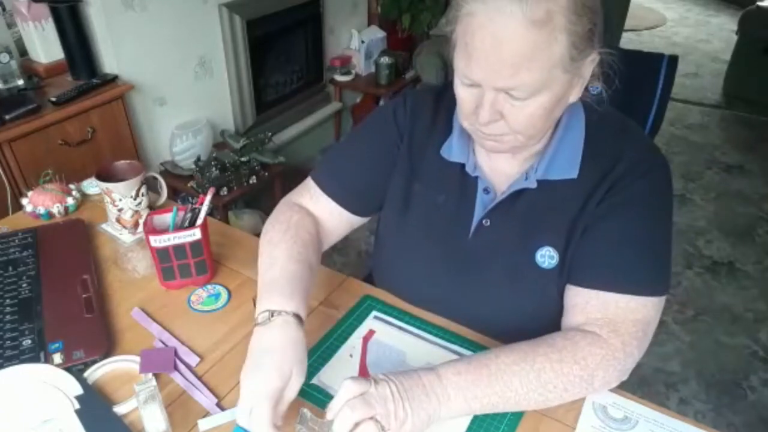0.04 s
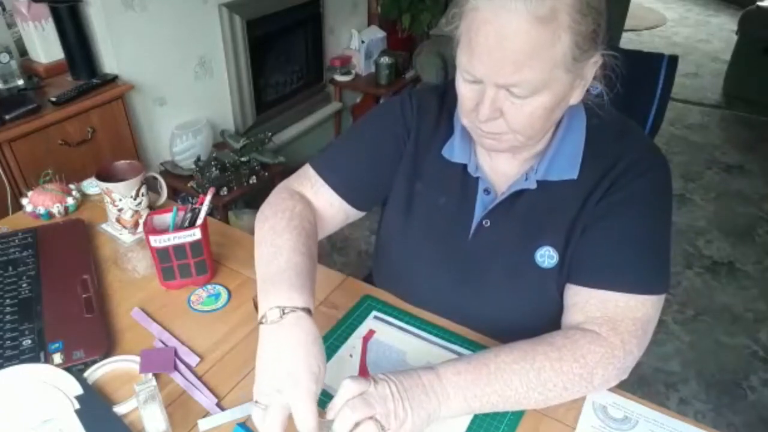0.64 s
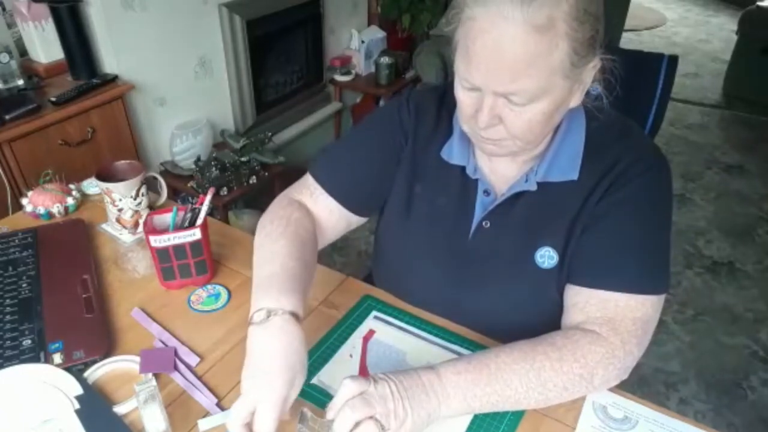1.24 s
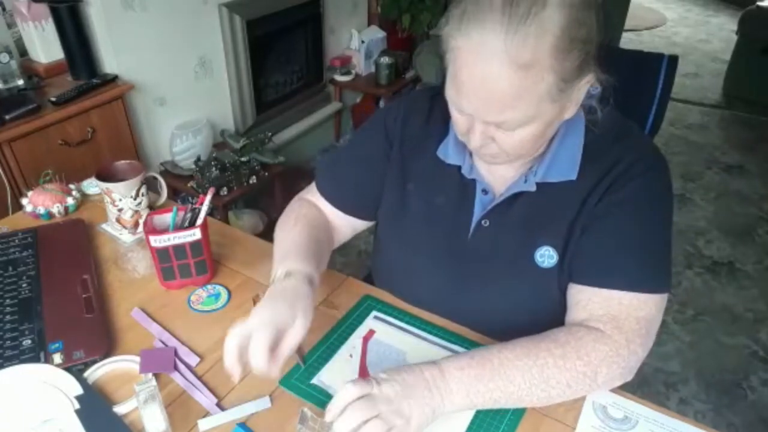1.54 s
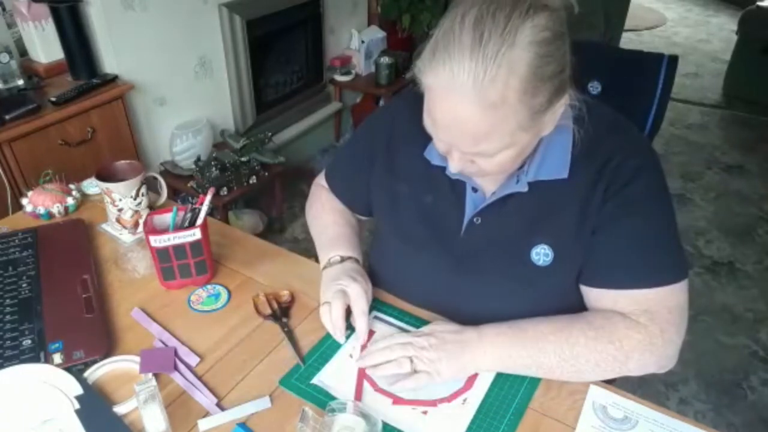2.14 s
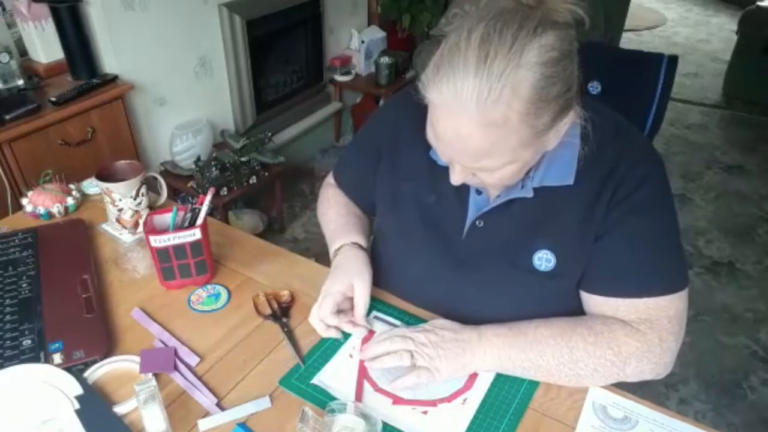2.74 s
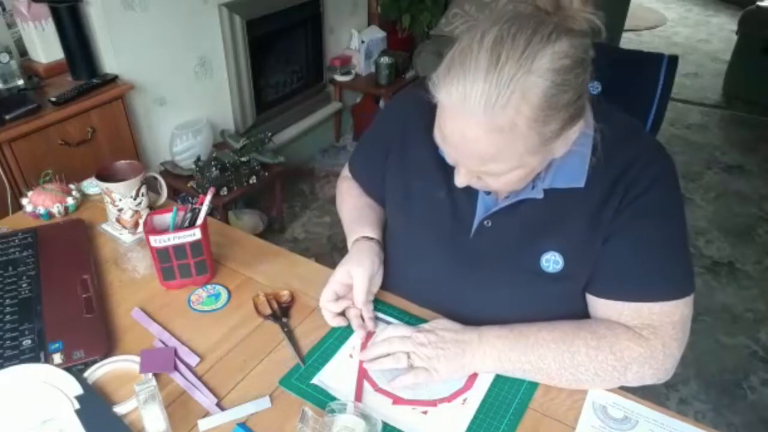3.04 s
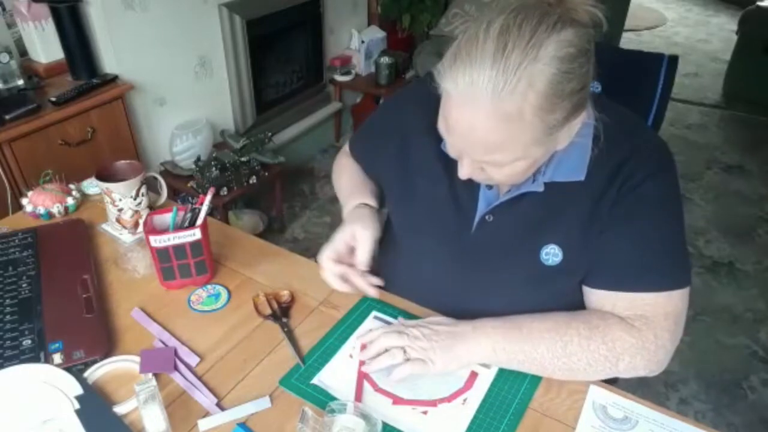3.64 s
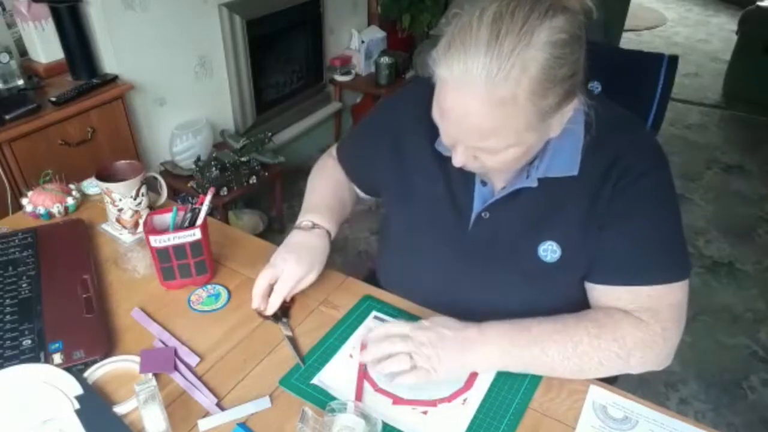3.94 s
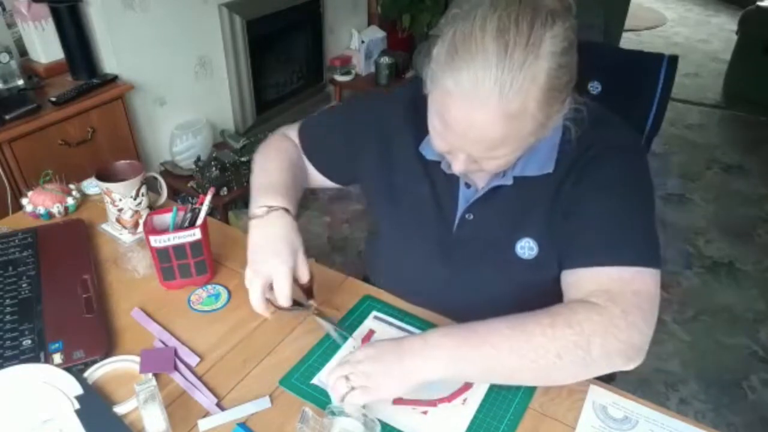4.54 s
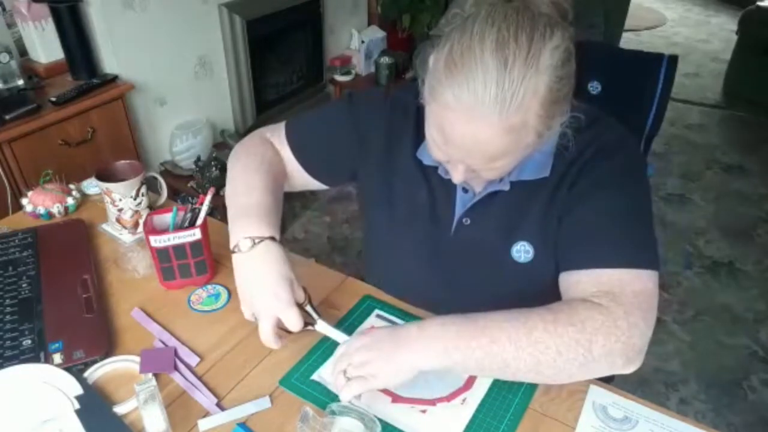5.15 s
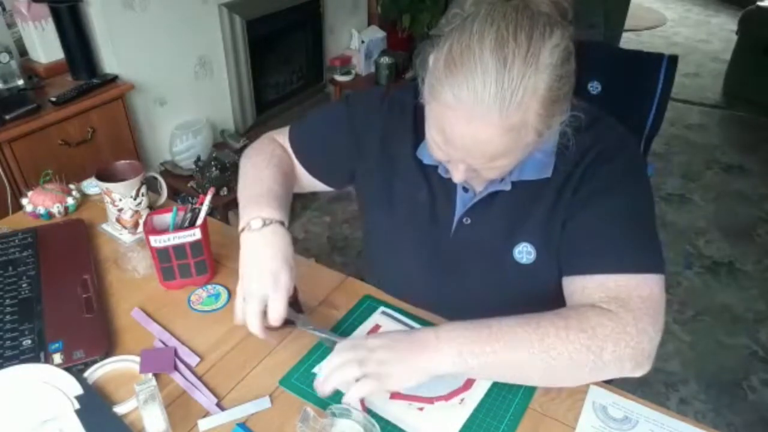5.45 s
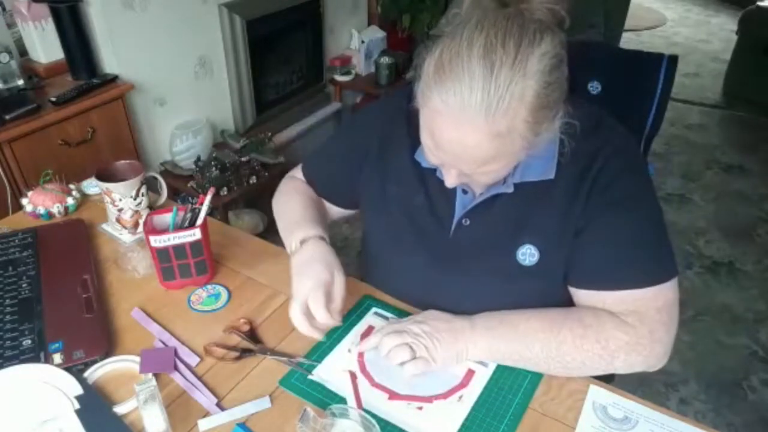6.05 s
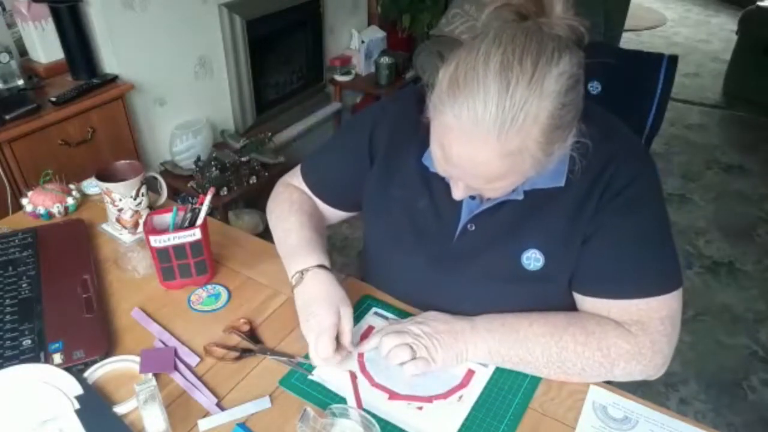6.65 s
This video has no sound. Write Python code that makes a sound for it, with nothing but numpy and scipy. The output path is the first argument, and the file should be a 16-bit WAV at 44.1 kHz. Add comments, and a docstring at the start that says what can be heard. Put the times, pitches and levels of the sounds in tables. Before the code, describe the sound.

Close by at a wooden table in a small, quiet room, someone tugs sticky tape from a roll and tears it off. Soft paper swishes follow, then a few ticks and a dry, bright snap. Scissors knock lightly as they are lifted, cut through paper with a single sharp snip, and are put down with a brief rattle. A faint hiss and low drone lie underneath.

```python
"""Scissors snip once and clatter onto a wooden table, after tape is pulled off its roll in jerks and torn
and a paper strip is pressed onto a cutting mat. Each contact is a noise crack plus damped modes of the
object and the table. The tape sticks and slips; rubbing and shearing are grainy filtered noise.
A small, quiet room adds short reverberation, hiss and a low drone."""
import sys
import numpy as np
from scipy import signal
from scipy.fft import rfft, irfft, next_fast_len
from scipy.io import wavfile
from scipy.ndimage import map_coordinates

SR = 44100
rng = np.random.default_rng(int(sys.argv[2]) if len(sys.argv) > 2 else 0)


def generate_wav(signal):
    """Clip the signal to [-1, 1] and save it as 16-bit WAV at the path in sys.argv[1]."""
    frames = np.transpose(np.atleast_2d(signal))
    scaled = np.clip(frames, -1, 1) * 32767
    pcm = np.round(scaled).astype(np.int16)
    wavfile.write(sys.argv[1], SR, pcm)


N = 299880
T = np.arange(SR // 2) / SR  # time axis of one contact, s

# scissor handles and steel blades: f/Hz, level/dB, t60/s
SCISSOR_MODES = [(870, -8, .06), (925, -6, .08), (1088, -3, .14), (1140, -1, .18), (1260, -3, .08),
                 (1385, 0, .1), (1477, -4, .08), (2190, -5, .12), (2331, -5, .12), (2503, -5, .12),
                 (2810, -4, .11), (3946, -3, .1), (4721, -4, .1), (5030, -4, .08), (7321, -5, .09),
                 (7887, -2, .08), (8533, -4, .12), (9292, -6, .08), (11170, -2, .08), (11750, -4, .08),
                 (14500, -8, .06)]


def amp(db):
    """Decibels to gain."""
    return 10 ** (np.asarray(db) / 20)


def unit(x):
    """Scale to rms 1."""
    return x / np.sqrt(np.mean(x ** 2) + 1e-20)


def one_blow(x):
    """Scale each channel to the energy of 1 ms at rms 1."""
    return x * np.sqrt(SR / 1000 / np.sum(x ** 2, axis=-1, keepdims=True))


def along(points, hz):
    """Interpolate (f/Hz, value) points on a log axis."""
    knots_hz, values = np.transpose(points)
    return np.interp(np.log(hz + 1), np.log(knots_hz + 1), values)


def wobble(rate_hz, size):
    """Smooth random curve."""
    knots = rng.standard_normal(int(size * rate_hz / SR) + 4)
    return map_coordinates(knots, [np.arange(size) * rate_hz / SR])


def filtered(x, response):
    """Apply the frequency response response(hz)."""
    size = x.shape[-1]
    padded = next_fast_len(size + 4096, True)
    return irfft(rfft(x, padded) * response(np.fft.rfftfreq(padded, 1 / SR)), padded)[..., :size]


def causal(spectrum):
    """Minimum-phase response: nothing sounds before the blow."""
    cepstrum = irfft(np.log(amp(along(spectrum, np.fft.rfftfreq(len(T), 1 / SR)))))
    cepstrum[1:len(T) // 2] *= 2
    cepstrum[len(T) // 2 + 1:] = 0
    return np.exp(rfft(cepstrum))


def split(x, edge_hz):
    """Low and high band, each at the energy of one blow."""
    return [one_blow(signal.sosfilt(signal.butter(4, edge_hz, side, fs=SR, output="sos"), x))
            for side in ("low", "high")]


def noise_pair(corr, size):
    """Stereo white noise with left-right correlation corr."""
    common = np.sqrt(corr) * rng.standard_normal(size)
    return common + np.sqrt(1 - corr) * rng.standard_normal((2, size))


def add(track, start_s, sound):
    """Mix a sound into the track."""
    start = round(start_s * SR)
    part = sound[:, max(-start, 0):N - start]
    track[:, max(start, 0):][:, :part.shape[1]] += part


def fade(t60_s):
    """Exponential decay."""
    return np.exp(-np.log(1000) * T / t60_s)


def burst(colour, envelope, corr):
    """Short coloured puff of noise."""
    return one_blow(irfft(rfft(noise_pair(corr, len(T)) * envelope) * colour))


def ring(modes, spread_rad):
    """Damped modes, with random strengths per blow and phases per channel."""
    sound = 0
    for hz, db, t60_s in modes:
        level, phase, apart = rng.standard_normal(3)
        phase_rad = np.pi * phase + spread_rad * apart * np.array([[1], [-1]])
        sound += amp(db + 2 * level) * fade(t60_s) * np.sin(2 * np.pi * hz * T + phase_rad)
    attack = 1 - fade(6 / modes[0][0])  # six periods of the first mode
    return one_blow(sound * attack)


def room_tone(hiss_db=-65, drone_db=-66, drone_hz=97, half_width_hz=12, waver_db=2):
    """Faint even hiss over a low, unsteady drone."""
    # hiss spectrum: f/Hz, density/dB
    hiss_spectrum = [(12, -53), (20, -20.5), (58, -12.5), (96, -7.5), (210, -20.5), (277, -18),
                     (319, -20.5), (357, -19), (527, -25), (802, -23), (2080, -28), (2320, -27.5),
                     (2600, -30), (14300, -34), (16000, -40.5)]
    # hiss stereo image: f/Hz, left-right correlation
    hiss_corr = [(60, 0.92), (180, 0.93), (550, -0.13), (1650, -0.18), (4970, -0.16), (15000, -0.2)]

    def mid_side(hz):
        angle = np.arccos(along(hiss_corr, hz)) / 2
        return amp(along(hiss_spectrum, hz)) * [np.cos(angle), np.sin(angle)]

    mid, side = filtered(rng.standard_normal((2, N)), mid_side)
    hiss = amp(hiss_db) * unit(np.array([mid + side, mid - side]))
    band = filtered(rng.standard_normal(N), lambda hz: 1 / (1 + ((hz - drone_hz) / half_width_hz) ** 2))
    drone = amp(drone_db + waver_db * wobble(2.8, N)) * unit(band)
    return hiss + drone * amp([[1], [-1]])


def in_room(sound, wet_db):
    """Direct sound plus wall reflections, a new noise tail per event."""
    # reverberation time: f/Hz, t60/s
    decay = [(200, .3), (700, .28), (2000, .26), (5000, .22), (13000, .185)]
    # reverberation colour: f/Hz, level/dB
    colour = [(100, -9.5), (400, -3.5), (1000, -1.5), (4000, 2), (9000, -2.5), (15000, -3.5)]
    hz, t, bins = signal.stft(noise_pair(0.26, len(T)), SR, nperseg=256)
    bins *= amp(along(colour, hz)[:, None] - 60 * t / along(decay, hz)[:, None])
    tail = signal.istft(bins, SR, nperseg=256)[1][:, :len(T)] * (1 - fade(0.0062))
    heard = signal.fftconvolve(sound, amp(wet_db) * tail / np.linalg.norm(tail[0]), axes=1)
    heard[:, :sound.shape[1]] += sound
    return heard


def friction(size, colour, corr, grain_db=4.5, grain_hz=300):
    """Sliding contact: a stream of fine catches, at rms 1."""
    return unit(filtered(noise_pair(corr, size) * amp(grain_db * wobble(grain_hz, size)), colour))


def strokes(rows, width_oct, peak_share, corr, centre_hz=None):
    """Band-limited friction swells and eases with the pressure; a row may set its own centre."""
    track = np.zeros((2, N))
    for start_s, length_s, db, *own_hz in rows:
        size = int(max(length_s, .01) * SR)
        band_hz = own_hz[0] if own_hz else centre_hz
        rub = friction(size, lambda hz: np.exp(-.5 * (np.log2((hz + 1) / band_hz) / width_oct) ** 2), corr)
        pressure = np.interp(np.linspace(0, 1, size), [0, peak_share, 1], [0, 1, 0])
        add(track, start_s, in_room(amp(db) * pressure * rub, wet_db=0))
    return track


def rubbing():
    """Sliding contacts: high for paper, blades and tape, lower for things on wood."""
    # paper swishes under the fingers and the closing blades: t/s, length/s, level/dB
    swishes = [(1.82, 0.44, -73.5), (2.253, 0.17, -63), (2.62, 0.57, -65.5), (3.437, 0.083, -36),
               (3.52, 0.44, -65.5), (4.322, 0.26, -58.5), (5.165, .035, -49), (5.46, 0.31, -48.5)]
    # hands and roll shift; the table booms and thuds under the rattling scissors:
    # t/s, length/s, level/dB, f/Hz
    rumbles = [(.275, 0.16, -56, 230), (.85, .1, -33.5, 340), (1.265, 0.065, -45.5, 350),
               (1.47, 0.11, -55, 300), (1.65, .7, -71, 330), (3.935, 0.058, -48, 282), (4.2, 0.13, -53, 98),
               (4.58, 0.81, -63.5, 95), (5.31, .08, -58.5, 500), (5.42, 0.27, -59.5, 450),
               (5.685, 0.082, -42, 300), (5.87, .11, -40, 330)]
    # things scuff on the wood, tape creeps, paper creases: t/s, length/s, level/dB, f/Hz
    scuffs = [(-.04, 0.12, -52, 1710), (.223, 0.011, -53, 3440), (.265, 0.09, -60, 4060),
              (.43, 0.071, -60.5, 1630), (.722, 0.059, -41.5, 2930), (1.424, 0.0089, -36.5, 2520),
              (1.441, 0.0096, -56.5, 2300), (3.358, 0.032, -56.5, 3850), (4.025, .06, -47, 790),
              (4.09, 0.11, -49.5, 1100), (5.49, 0.12, -61.5, 1494)]
    # a thin high ring as the tape tears: t/s, length/s, level/dB
    tear_ring = [(1.254, 0.012, -27.5)]
    return (strokes(swishes, width_oct=0.57, peak_share=0.18, corr=.15, centre_hz=9100)
            + strokes(rumbles, width_oct=0.56, peak_share=0.14, corr=.88)
            + strokes(scuffs, width_oct=1.0, peak_share=0.28, corr=.25)
            + strokes(tear_ring, width_oct=0.2, peak_share=0.32, corr=.15, centre_hz=6740))


def contacts(rows, crack_spectrum, modes, *, snap_t60_s, scatter_t60_s, scatter_db, sharp_db, zing_db,
             ring_db, body_db, body_t60_s, bite_db, bite_slope, bite_ring_slope=0,
             thud_db, thud_slope, wet_db):
    """Each contact cracks, rings the object and thuds into the table. Slopes in dB per dB of the row."""
    # wooden table: f/Hz, level/dB, t60/s
    table_modes = [(99, -3, 0.15), (171, -15.5, 0.24), (278.8, -0.5, 0.19), (320, -4.5, 0.18),
                   (364.4, -7.5, 0.22), (450, -6.5, 0.04), (538.8, 0, 0.085), (624, -7.5, 0.14),
                   (694, -13, 0.14)]
    # thud in the wood: f/Hz, density/dB
    thud_spectrum = [(30, -50.5), (60, -35.5), (100, -10), (140, -7), (280, -4), (450, -3.5), (700, -6.5),
                     (1200, -19), (3000, -59)]
    # midrange noise of a blow: f/Hz, density/dB
    body_spectrum = [(300, -28.5), (700, -13), (1150, -0.5), (1700, -12.5), (3000, -12.5), (6000, -33)]
    crack, body, thud = causal(crack_spectrum), causal(body_spectrum), causal(thud_spectrum)
    hard_hz = 2000  # modes above answer the hard edge of a blow, those below its push
    low_modes = [mode for mode in modes if mode[0] < hard_hz]
    high_modes = [mode for mode in modes if mode[0] >= hard_hz]
    # first snap, then scatter off the tabletop and the things on it
    snap = (fade(snap_t60_s) + amp(scatter_db) * fade(scatter_t60_s)) * (1 - fade(.001))
    track = np.zeros((2, N))
    for start_s, db, ring_rel_db in rows:
        edge = burst(crack, snap, corr=0.25) + amp(zing_db) * ring(high_modes, spread_rad=1.0)
        bite, sharp = split(edge, edge_hz=4940)
        hollow = amp(ring_db) * ring(low_modes, spread_rad=0.66)
        hollow += amp(body_db) * burst(body, fade(body_t60_s), corr=0.55)
        wood = ring(table_modes, spread_rad=0.098) + amp(-5) * burst(thud, fade(0.13), corr=0.92)
        blow = amp(db + sharp_db) * sharp + amp(db + ring_rel_db) * hollow
        blow += amp(bite_db + bite_slope * db + bite_ring_slope * ring_rel_db) * bite
        blow += amp(thud_db + thud_slope * db) * wood
        add(track, start_s, in_room(blow, wet_db))
    return track


def paper_snaps():
    """The strip ticks and snaps under the fingers, dry and bright."""
    # snaps: t/s, level/dB, relative ring/dB
    snaps = [(3.179, -39, -47), (3.3746, -42, -46), (3.4385, -35, -48), (3.4446, -24.5, -49),
             (3.4544, -28, -46), (3.477, -7.5, -28)]
    # paper crack: f/Hz, density/dB
    crack = [(1060, -19), (1800, -14), (2640, -9), (3350, -14.5), (4660, -14), (5490, -19), (11500, -5),
             (13600, -11), (16000, -18)]
    # paper on the cutting mat: f/Hz, level/dB, t60/s
    mat_modes = [(890, 26, 0.034), (1000, -9, .07), (1400, 2, .07), (1755, -15, .06), (2040, -9, .05),
                 (6180, -13, 0.026), (10720, -1, 0.036)]
    return contacts(snaps, crack, mat_modes, snap_t60_s=.004, scatter_t60_s=.02, scatter_db=-12,
                    sharp_db=-2.5, zing_db=-23, ring_db=0.5, body_db=4, body_t60_s=0.05,
                    bite_db=-30, bite_slope=0.92, thud_db=-21, thud_slope=1.44, wet_db=-4)


def tape(first_gap_s=.0066, gap_ratio=1.038, ring_db_per_s=149.5):
    """Glue holds and lets go in slowing slips; the hollow roll rings more as the free tape lengthens."""
    # a tap on the roll, then pulls from one snap to a long rip: t/s, length/s, level/dB, relative ring/dB
    events = [(0.318, .003, -62, 19), (0.7258, .003, -23, -18), (0.7675, .003, -25, -13),
              (0.8136, .003, -11, -17.5), (0.832, .074, -6, -20.5), (0.9221, .003, -3.5, -15),
              (1.083, .018, -32, -41), (1.1062, .003, -17.5, -15.5), (1.1712, .003, -12, -11),
              (1.255, .009, -8, -28.5), (1.2712, .003, -10, -17.5)]
    # tape crack: f/Hz, density/dB
    crack = [(1060, -40), (1800, -5), (2430, -8), (3200, -13.5), (3510, -5), (3950, -11), (4410, -9),
             (5700, -10.5), (6180, -7), (7160, -4), (7990, -5.5), (9590, -5.5), (11700, -3), (13900, -7.5),
             (16000, -11)]
    # roll and holder: f/Hz, level/dB, t60/s
    roll_modes = [(816.4, -9, .04), (866, -5, 0.054), (977, -4.5, 0.051), (1040, -4.5, 0.029),
                  (1167.4, -1.5, 0.076), (1250, -6, 0.076), (1354, -2.5, 0.049), (1450, -8.5, 0.032),
                  (1440, -8, 0.037), (3560, -2.5, 0.1), (3770, -6.5, 0.053), (4380, -3, 0.076),
                  (6150, -3, 0.067), (6324, -5, 0.043), (7800, 0, 0.057), (11200, -1, 0.05),
                  (11140, 3, .09), (10600, 0, .07), (10900, -2.5, 0.039)]
    delays_s = np.r_[0, np.cumsum(first_gap_s * gap_ratio ** np.arange(16))]
    slips = [(start_s + t, db, ring_rel_db + ring_db_per_s * t)
             for start_s, length_s, db, ring_rel_db in events for t in delays_s if t <= length_s]
    return contacts(slips, crack, roll_modes, snap_t60_s=0.0017, scatter_t60_s=0.038, scatter_db=1,
                    sharp_db=-3, zing_db=-12, ring_db=2.5, body_db=4, body_t60_s=0.055,
                    bite_db=-13, bite_slope=.85, bite_ring_slope=0.19,
                    thud_db=-19, thud_slope=1.1, wet_db=-7.5)


def scissor_cut(start_s=4.95, end_s=5.192, end_db=-44.5, rise_db_per_s=99):
    """Closing blades shear the paper, ever louder until they meet."""
    # blades through paper: f/Hz, density/dB
    spectrum = [(200, -20.5), (700, -4), (1500, -17), (3200, -3), (5000, -4), (8000, 0.5), (12000, -2),
                (16000, -7.5)]
    remaining_s = np.arange(end_s - start_s, 0, -1 / SR)
    shear = friction(len(remaining_s), lambda hz: amp(along(spectrum, hz)), corr=0.17, grain_db=7)
    track = np.zeros((2, N))
    add(track, start_s, in_room(amp(end_db - rise_db_per_s * remaining_s) * shear, wet_db=4.5))
    return track


def blade_clicks():
    """Steel clicks on steel, damped by the hand."""
    # blades open, snip shut and part: t/s, level/dB, relative ring/dB
    clicks = [(4.4828, -29, -55), (4.5069, -30.5, -43), (4.94, -41.5, -39.5), (5.1439, -37.5, -21),
              (5.1918, -6, -36), (5.3428, -32, -32.5), (5.3575, -31.5, -32.5), (5.4077, -38.5, -26),
              (5.471, -36.5, -25.5)]
    # steel crack: f/Hz, density/dB
    crack = [(1060, -41.5), (1800, -14), (2840, -12.5), (3120, -11), (4790, -20), (7490, -10.5),
             (9250, -14), (11700, -3), (12800, -18.5), (16000, -12)]
    return contacts(clicks, crack, SCISSOR_MODES, snap_t60_s=.006, scatter_t60_s=.02, scatter_db=-15,
                    sharp_db=1.5, zing_db=-21.5, ring_db=-10.5, body_db=0, body_t60_s=0.021,
                    bite_db=-21.5, bite_slope=.75, thud_db=-46, thud_slope=0.29, wet_db=-4.5)


def table_knocks():
    """Tape roll, hands and scissors knock on the table; the scissors clatter down last."""
    # knocks: t/s, level/dB, relative ring/dB
    knocks = [(1.4252, -58.5, 5), (1.4789, -51, 2), (3.9342, -60.5, -2), (3.9481, -58.5, 5),
              (4.0792, -27.5, -9), (4.0977, -30.5, -8), (4.2004, -40.5, -8), (4.2324, -24, -10.5),
              (5.5639, -2.5, -15), (5.585, -12, -2.5), (5.7485, -30, -4), (5.7578, -1, -23),
              (5.7691, -6.5, -15), (5.7993, -10, -11.5), (5.8222, -9.5, -13.5), (5.8709, -26.5, -3),
              (5.9188, -25.5, -10.5), (5.9491, -35.5, -41)]
    # crack on wood: f/Hz, density/dB
    crack = [(1060, -35.5), (1800, -1), (2790, -0.5), (3380, -10), (3840, -4.5), (6300, -9.5), (7840, -5),
             (9080, -11), (11400, -6.5), (12700, -13.5), (15000, -9), (16000, -23.5)]
    return contacts(knocks, crack, SCISSOR_MODES, snap_t60_s=0.03, scatter_t60_s=0.05, scatter_db=-1,
                    sharp_db=-1.5, zing_db=-9.5, ring_db=3, body_db=8, body_t60_s=0.028,
                    bite_db=1, bite_slope=1, bite_ring_slope=0.76,
                    thud_db=-13, thud_slope=0.59, wet_db=-5)


def scene(left_lead_s=85e-6, low_cut_hz=75):
    """Handwork slightly to the left, over the room tone."""
    # stereo balance: f/Hz, left minus right/dB
    balance = [(100, 3), (500, 0.5), (1100, -0.5), (2200, -0.5), (4000, -1.5), (8000, -0.5), (12000, 4)]
    work = rubbing() + paper_snaps() + tape() + scissor_cut() + blade_clicks() + table_knocks()
    # the handwork carries almost no deep bass
    work = signal.sosfilt(signal.butter(3, low_cut_hz, "high", fs=SR, output="sos"), work)
    sides = np.array([[.5], [-.5]])

    def arrival(hz):
        return amp(along(balance, hz) * sides) * np.exp(2j * np.pi * hz * sides * left_lead_s)

    return filtered(work, arrival) + room_tone()


def record(dry, top_hz=16000):
    """Hard limit at full scale, then a steep low-pass."""
    return filtered(np.clip(dry, -1, 1), lambda hz: 1 / (1 + (hz / top_hz) ** 120))


dry = scene()
out = record(dry)
generate_wav(out)
```